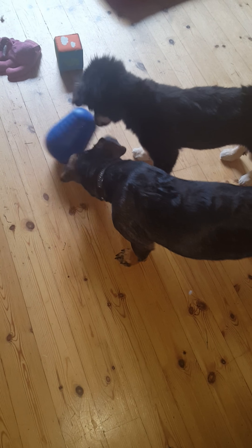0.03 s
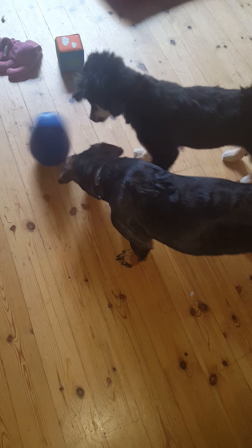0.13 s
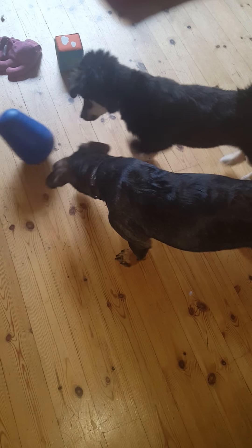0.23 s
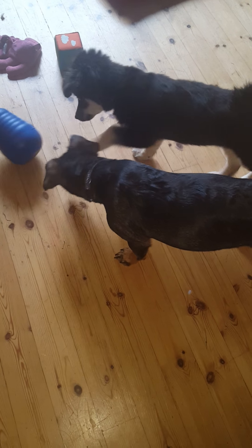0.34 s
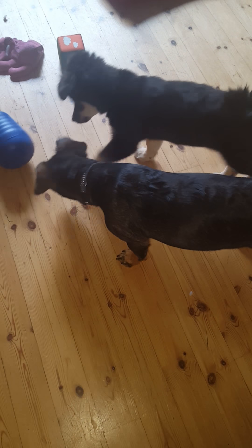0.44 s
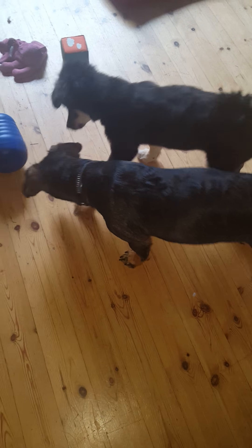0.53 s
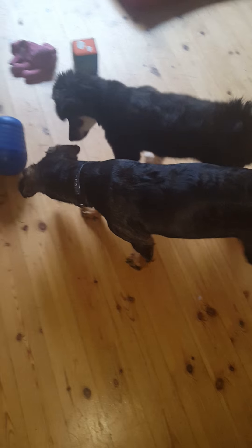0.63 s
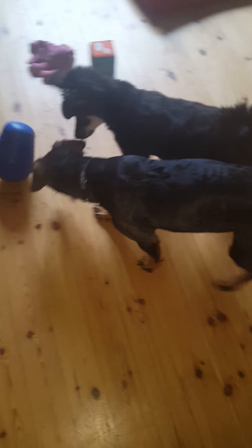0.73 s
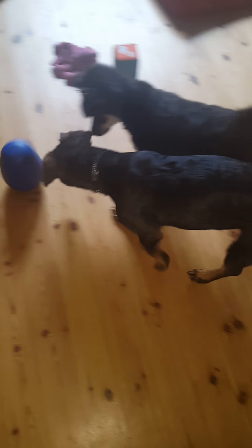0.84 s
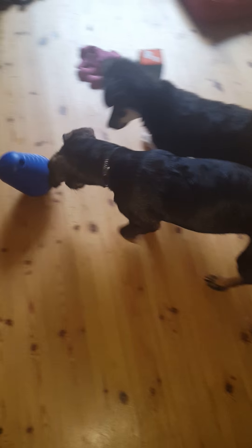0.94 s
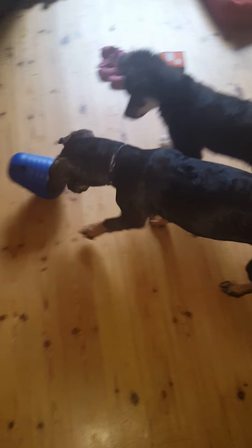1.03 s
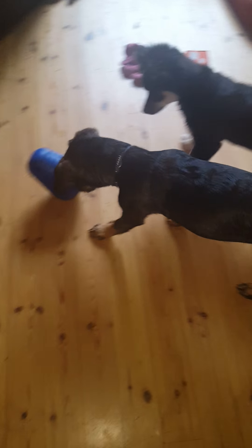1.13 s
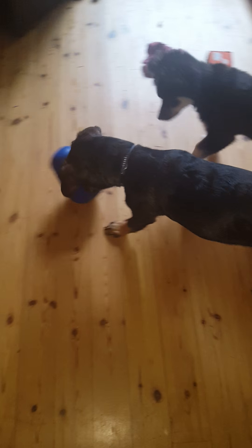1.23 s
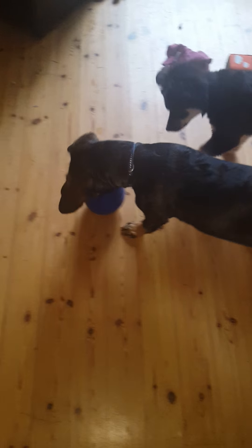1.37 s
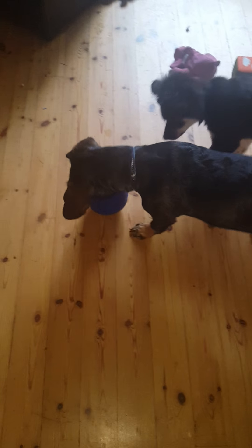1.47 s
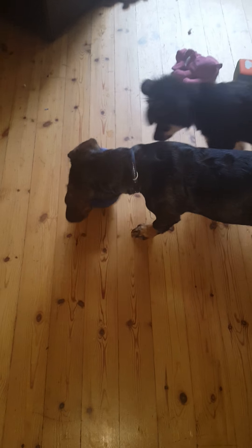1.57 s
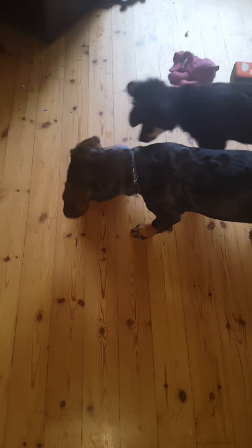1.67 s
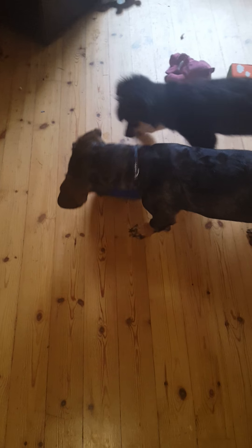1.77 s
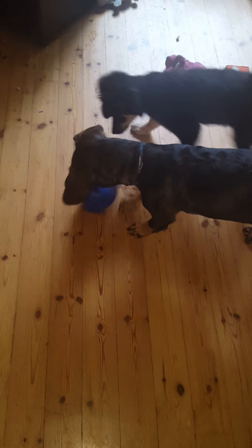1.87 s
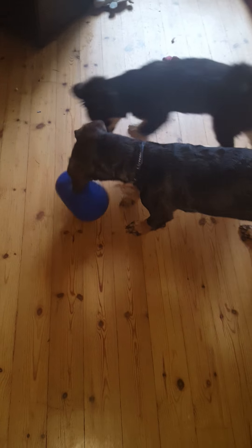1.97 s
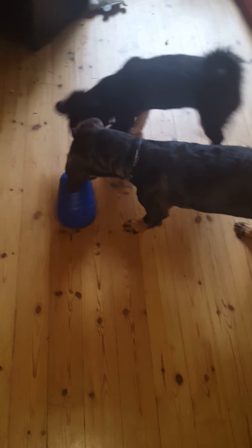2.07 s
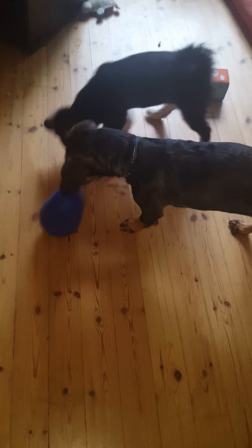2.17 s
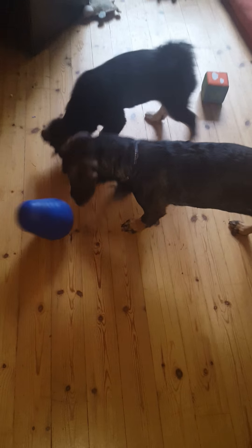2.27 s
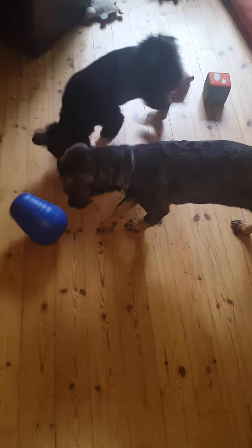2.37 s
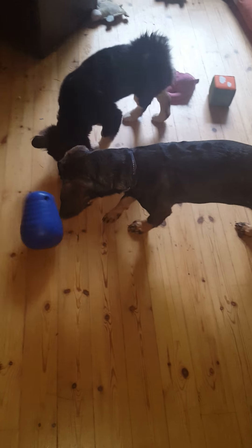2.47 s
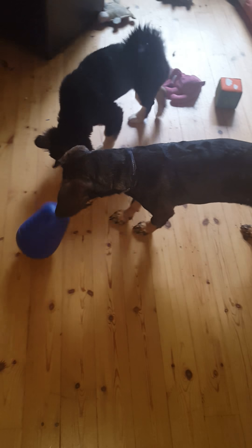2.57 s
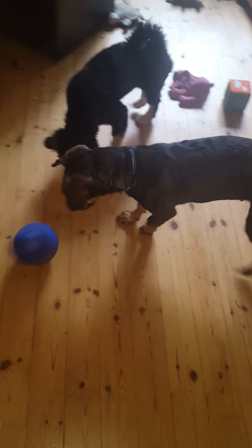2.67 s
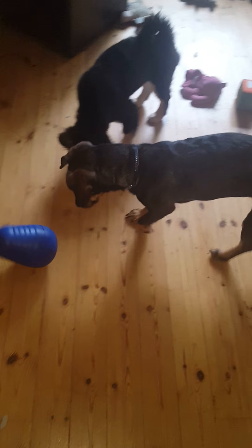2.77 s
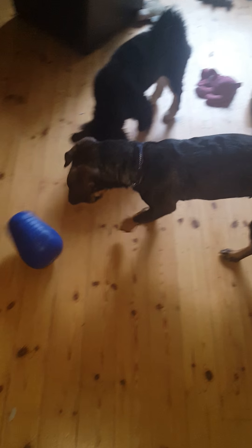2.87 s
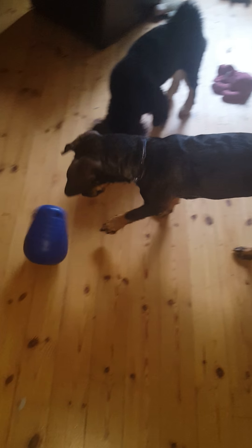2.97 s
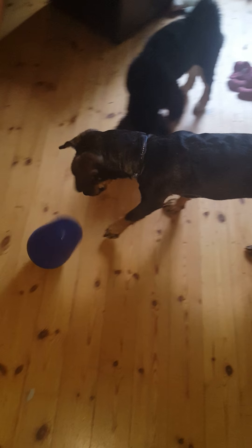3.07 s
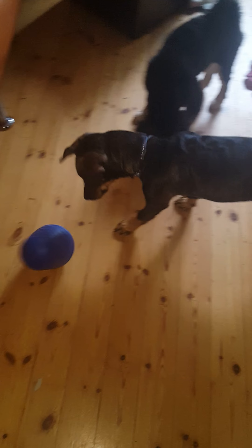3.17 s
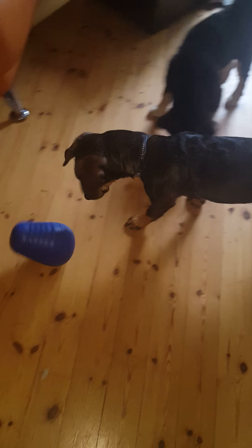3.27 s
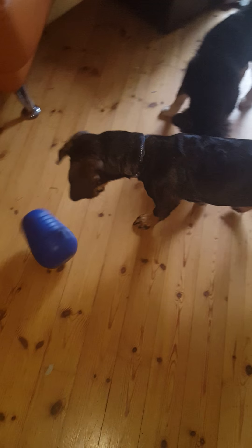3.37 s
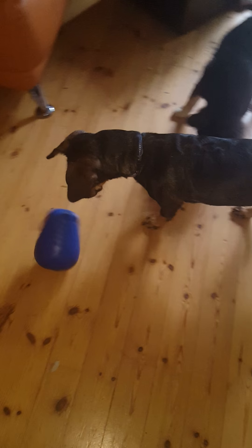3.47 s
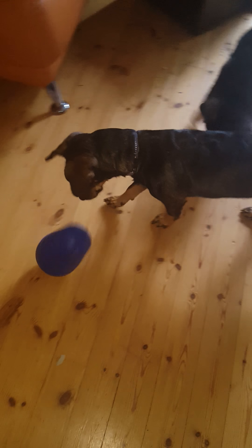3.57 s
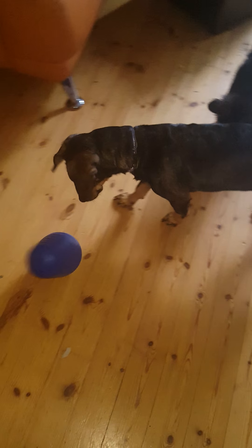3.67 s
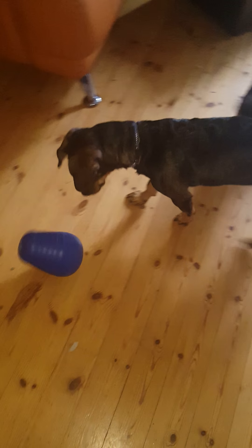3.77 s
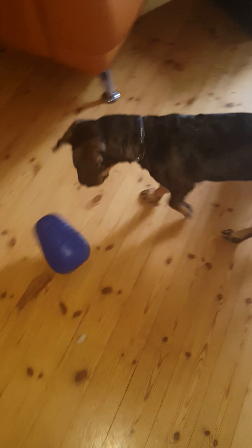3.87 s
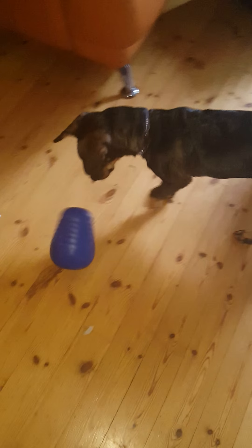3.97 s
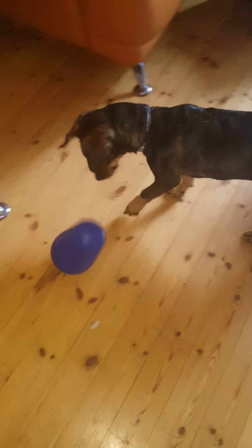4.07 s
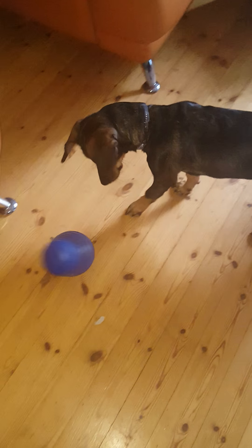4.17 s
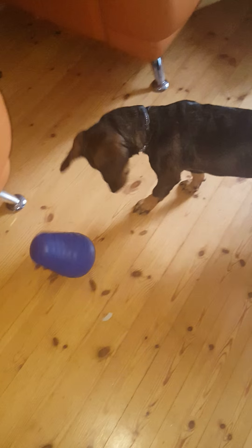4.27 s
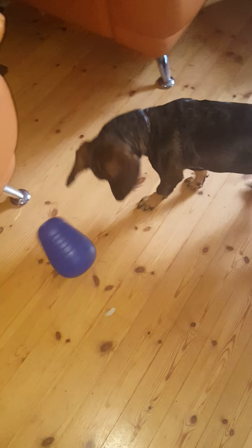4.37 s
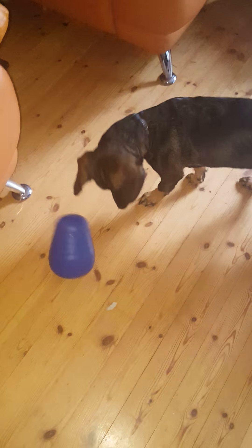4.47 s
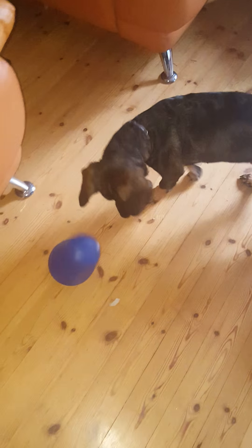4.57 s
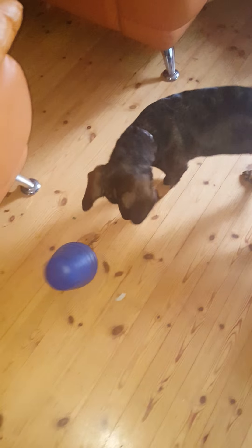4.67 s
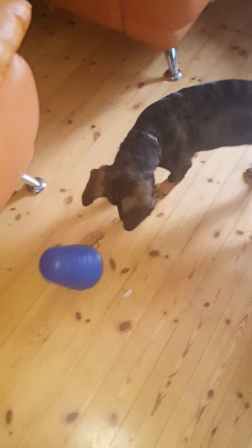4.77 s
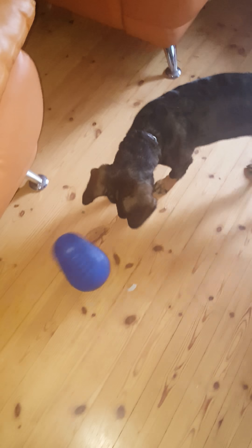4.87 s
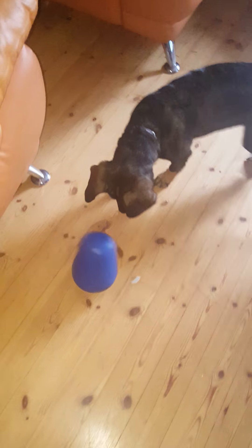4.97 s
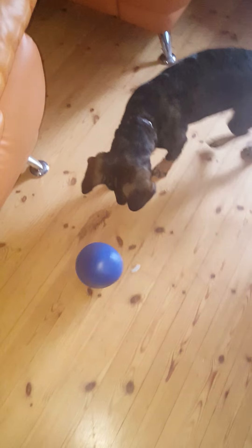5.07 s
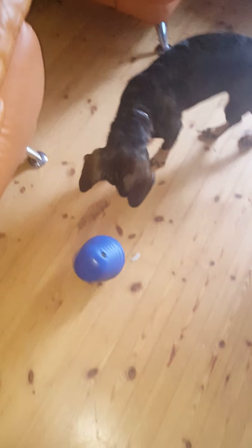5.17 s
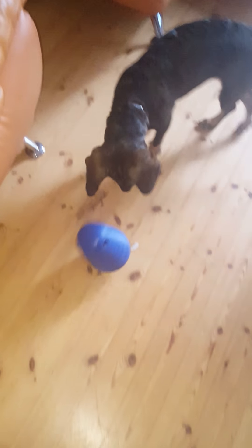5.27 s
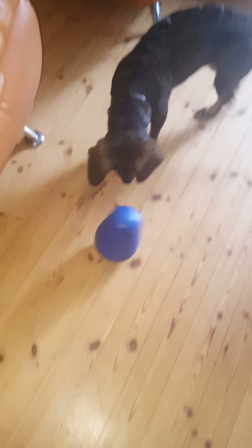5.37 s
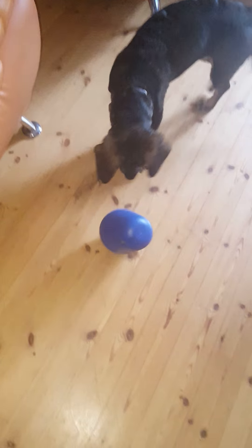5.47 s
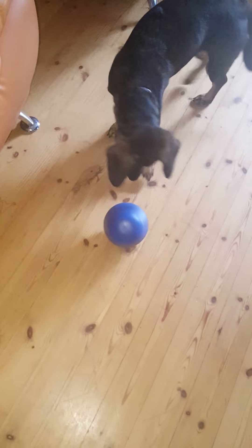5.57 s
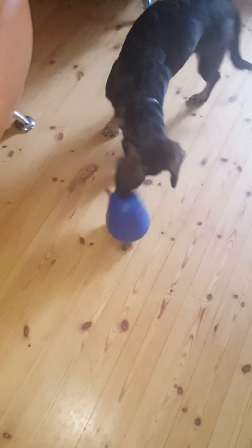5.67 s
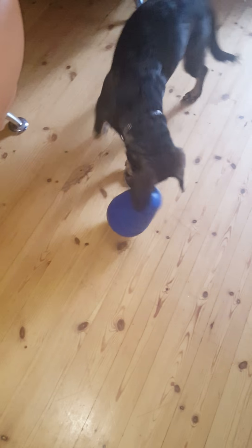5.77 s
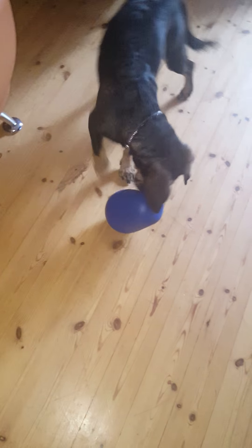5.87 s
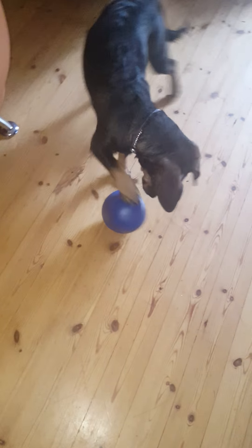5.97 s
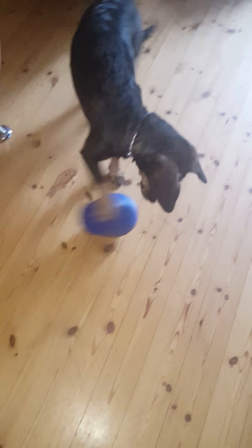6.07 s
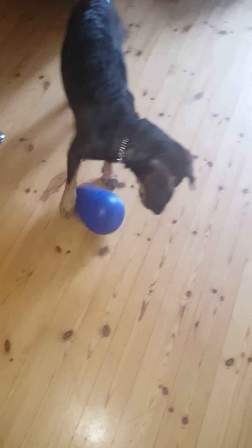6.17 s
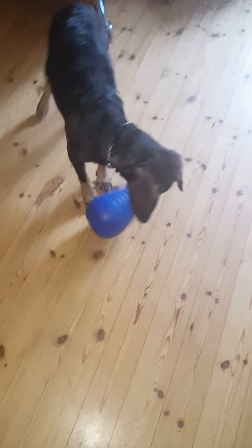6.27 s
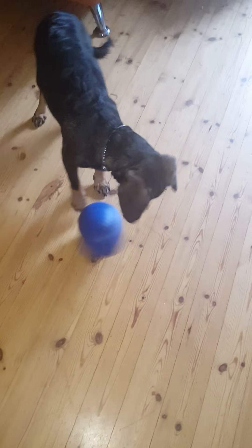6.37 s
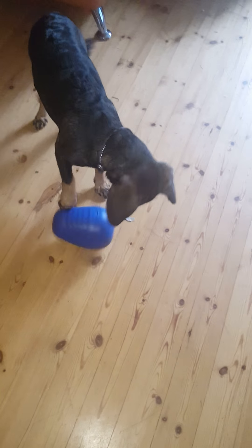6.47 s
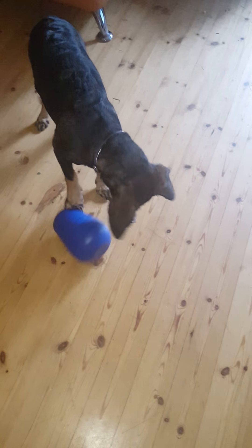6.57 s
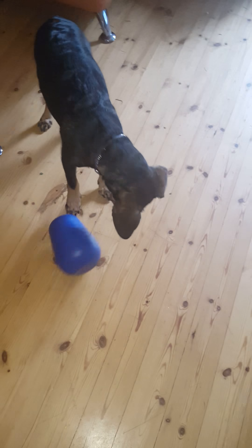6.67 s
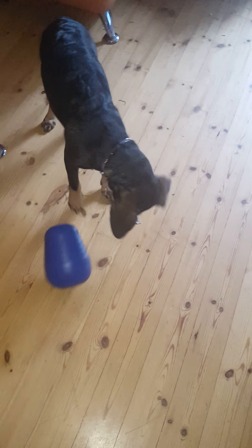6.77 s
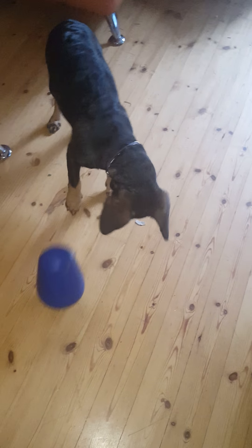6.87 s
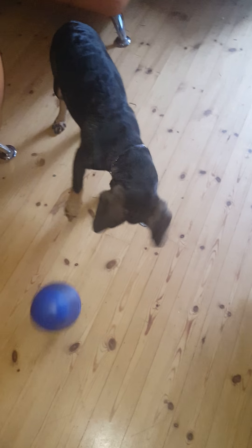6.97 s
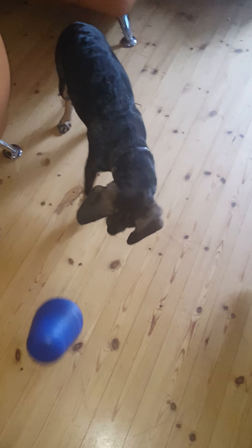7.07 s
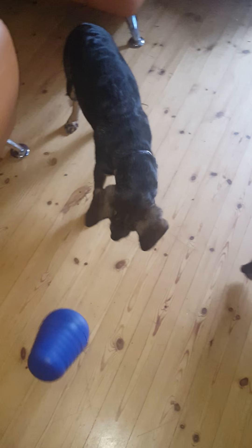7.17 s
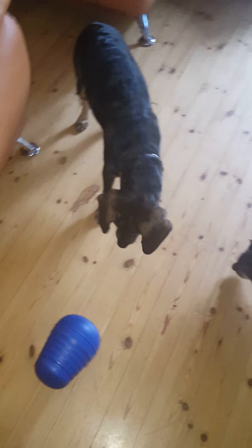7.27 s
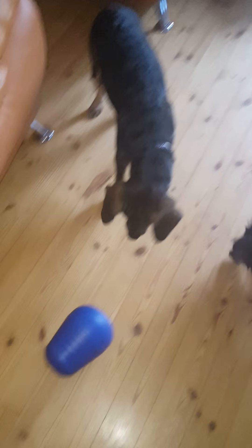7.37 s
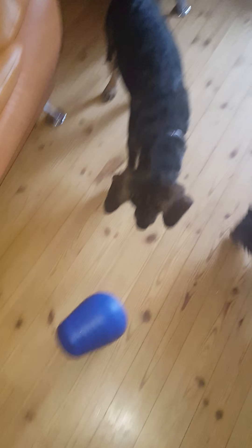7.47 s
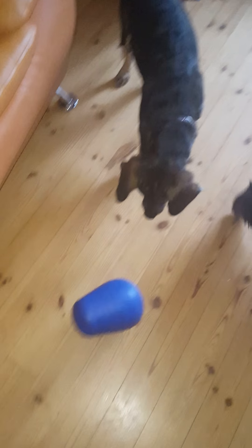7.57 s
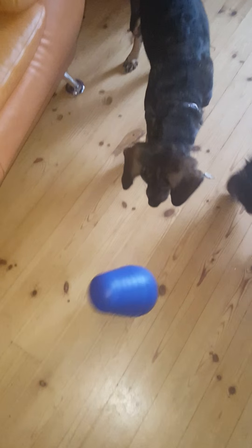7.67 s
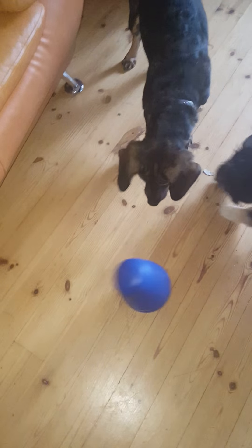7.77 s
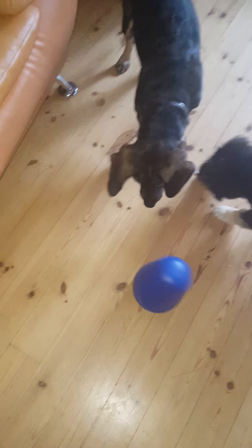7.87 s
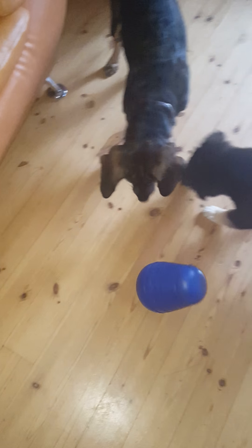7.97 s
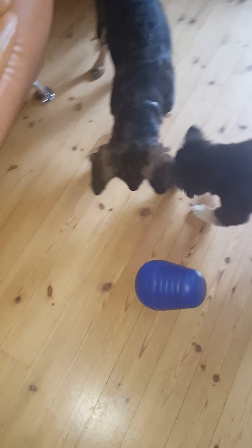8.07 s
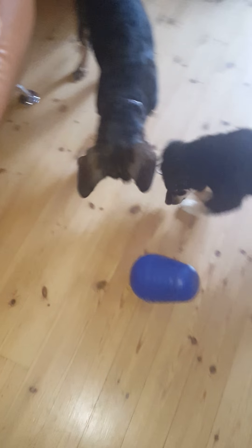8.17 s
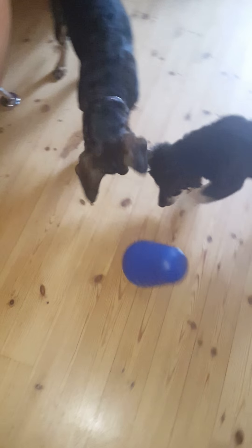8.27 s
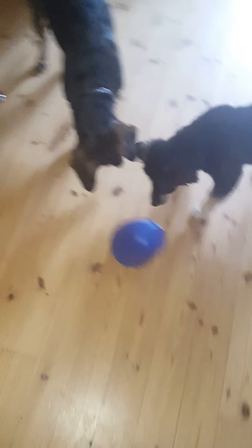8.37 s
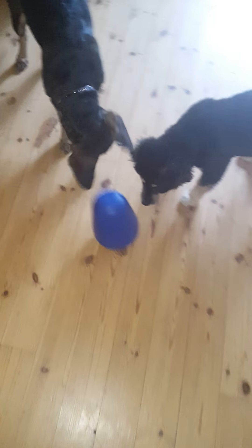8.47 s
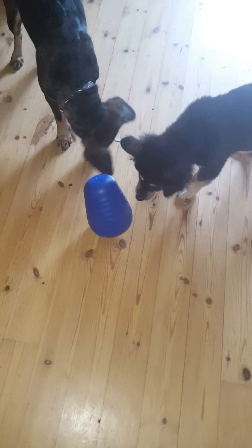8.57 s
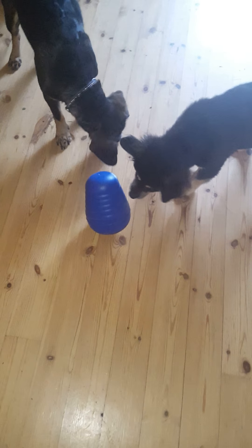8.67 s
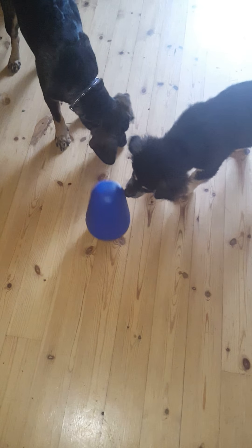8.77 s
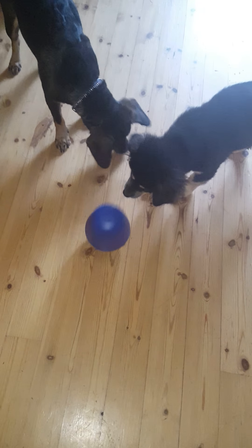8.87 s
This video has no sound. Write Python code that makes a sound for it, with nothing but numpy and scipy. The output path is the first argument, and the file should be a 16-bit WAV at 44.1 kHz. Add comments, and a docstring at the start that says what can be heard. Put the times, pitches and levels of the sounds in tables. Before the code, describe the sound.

A weighted hard plastic toy wobbles on a wooden floor, pellets sliding inside. Early thumps and rattles lead to a heavy bump, then fade into gentle rolling with faint taps. Later a paw presses it into a rapid run of woody knocks, claw clicks and bright rattling, followed by isolated thumps. Heard at close range in a small reverberant room with faint air noise, no voices.

```python
"""Dry kibble rattles in a hollow toy as it rumbles over floorboards, and its weighted base thumps at once.
Dogs nose and paw this plastic treat toy in a living room; claws, teeth and pellets click, skid and rub.
Kibble, rolling: random tiny impacts through shell, body and board resonances, gated by spells of motion.
Knocks, clicks, scrapes: timed contact forces through the same modes. Paws: shaped noise strokes.
Each contact and motion gets a short random stereo room tail; faint shaped noise is the room's air."""
import sys
import numpy as np
from scipy import signal
from scipy.fft import rfft, irfft, next_fast_len
from scipy.io import wavfile
from scipy.ndimage import uniform_filter1d

SR = 44100
rng = np.random.default_rng(int(sys.argv[2]) if len(sys.argv) > 2 else 0)


def store_wav(level_fs):
    """Save 16-bit WAV to argv[1]."""
    pcm = np.round(np.clip(np.atleast_2d(level_fs), -1, 1) * 32767)
    wavfile.write(sys.argv[1], SR, pcm.T.astype(np.int16))


N = 392931
HIT = SR * 2 // 5  # samples per contact and per room tail
LEAD = SR // 50  # samples of swell ahead of a knock's blow


def amp(db):
    """Decibels to gain."""
    return 10 ** (np.asarray(db) / 20)


def unit(x):
    """Scale to rms 1."""
    return x / np.sqrt(np.mean(x ** 2) + 1e-20)


def along(points, hz):
    """(Hz, value) points interpolated on a log-frequency axis."""
    f, v = np.transpose(points)
    return np.interp(np.log(hz + 1), np.log(f + 1), v)


def filtered(x, response):
    """x times a response of frequency."""
    n = x.shape[-1]
    m = next_fast_len(n + SR // 10, real=True)
    hz = np.fft.rfftfreq(m, 1 / SR)
    return irfft(rfft(x, m) * response(hz), m)[..., :n]


def coloured(x, spectrum):
    """x through a broad spectral shape."""
    return filtered(x, lambda hz: amp(along(spectrum, hz)))


def bank(modes, hz):
    """Response of a set of resonances that radiate little outside their own range."""
    rings = 0
    for k, (centre, width, db) in enumerate(modes):
        damping = 1j * hz * width
        # alternate modes move in opposite phase
        rings = rings + (-1) ** k * amp(db) * damping / (centre * centre - hz * hz + damping)
    below = modes[0][0] * 0.66 / (hz + 1)
    above = hz / (modes[-1][0] * 0.94)
    return rings / np.sqrt((1 + below ** 4) * (1 + above ** 4))


def ringing(x, modes):
    """x through a set of resonances."""
    return filtered(x, lambda hz: bank(modes, hz))


def hump(hz, centre_hz, octaves):
    """A broad emphasis around one pitch."""
    return 1 / (1 + (np.log2((hz + 1) / centre_hz) / octaves) ** 2)


def ringing_near(x, modes, centre_hz, octaves):
    """x through resonances, favouring those near one pitch."""
    return filtered(x, lambda hz: bank(modes, hz) * hump(hz, centre_hz, octaves))


def wobble(rate):
    """A smooth random curve, rate knots a second."""
    knots = rng.standard_normal(int(N * rate / SR) + 2)
    return np.interp(np.arange(N) * rate / SR, np.arange(len(knots)), knots)


def struck(x):
    """Scale each contact to the energy of 30 ms at rms 1."""
    return x / np.sqrt(np.sum(x ** 2, axis=(1, 2), keepdims=True) / (2 * 0.03 * SR))


def placed(times_s, sounds):
    """A stereo track with each sound starting at its time."""
    out = np.zeros((2, N + SR))
    for s, sound in zip(np.ravel(times_s), sounds):
        start = max(round(s * SR) + LEAD, 0)
        out[:, start:start + sound.shape[-1]] += sound
    return out[:, LEAD:LEAD + N]


# room decay: f/Hz, t60/s
WALLS_T60 = [(120, 0.37), (300, 0.33), (1000, 0.56), (4000, 0.44), (8000, 0.39), (15000, 0.27)]
# left-right correlation of the tail: f/Hz, correlation
TAIL_CORRELATION = [(100, 0.92), (280, 1), (500, 0.33), (900, 0), (3000, 0), (12000, 0)]


def tails(count, wet_db):
    """The room's stereo answer from count places: noise decaying at its own rate in each band."""
    hz, t, z = signal.stft(rng.standard_normal((count, 2, HIT)), SR, nperseg=256)
    turn = np.arccos(np.clip(along(TAIL_CORRELATION, hz), -1, 1))[:, None] / 2
    mid = z[:, 0] * np.cos(turn)
    side = z[:, 1] * np.sin(turn)
    decay = amp(-60 * t / along(WALLS_T60, hz)[:, None])
    fade = decay * (1 - np.exp(-t / 0.00028))
    stereo = np.stack([mid + side, mid - side], 1)
    echo = signal.istft(stereo * fade, SR, nperseg=256)[1][..., :HIT]
    return echo * amp(wet_db) / np.sqrt(np.mean(np.sum(echo ** 2, axis=-1)))


def paths(count, wet_db):
    """Direct impulse plus room tail; the direct sound reaches the right port 3 samples later."""
    heard = tails(count, wet_db)
    heard[:, 0, 0] += 1
    heard[:, 1, 3] += 1
    return heard


def wandering(x, wet_db, count=36):
    """A moving source: each of count slices takes its own random path to the microphone."""
    size = -(-N // count)
    pieces = np.pad(x, (0, size * count - N)).reshape(count, 1, size)
    heard = signal.fftconvolve(pieces, paths(count, wet_db), axes=-1)
    return placed(np.arange(count) * size / SR, heard) / np.sqrt(1 + amp(wet_db) ** 2)


def impacts(rate, spread_db, clump_db):
    """Random tiny impacts, rate a second, in clumps; energy evened out over 50 ms."""
    spread = spread_db * np.clip(rng.standard_normal(N), -2, 2)
    size = amp(spread + clump_db * wobble(130))
    hits = size * rng.choice([-1, 1], N) * (rng.random(N) < rate / SR)
    local_power = np.abs(uniform_filter1d(hits ** 2, size=SR // 20))
    return unit(hits / np.sqrt(local_power + 1e-9))


BRISK_DB, GENTLE_SLOWER = -36, 0.3  # level where rise_s is the swell time; dB of extra time per dB below


def spells(starts, lengths, levels_db, rise_s, sag_db_per_s, stop_s):
    """Gain of motions that swell, sag and die away; overlapping ones add in power."""
    ahead = SR // 5
    t = np.arange(-ahead, SR) / SR
    power = np.zeros(N + 2 * SR)
    for s, length, db in zip(starts, lengths, levels_db):
        rise = rise_s * amp(GENTLE_SLOWER * (BRISK_DB - db))  # gentle motions swell more slowly
        swell = (1 + np.tanh((t - rise_s) / rise / 2)) / 2
        stop_db = 60 * np.maximum(t - length, 0) / stop_s
        gain = swell * amp(db - sag_db_per_s * t - stop_db)
        power[SR + round(s * SR) - ahead:][:len(t)] += gain ** 2
    return np.sqrt(power[SR:SR + N])


# kibble slides as the toy tips: t/s, length/s, level/dB, hollow ring re level/dB
SPILL_EVENTS = [(-0.08, 0.093, -33.5, -2.5), (0.08, 0.2, -38.5, -4.5), (0.356, 0.11, -29, -6.5),
                (0.637, 0.27, -38.5, -5.5), (1.035, 0.093, -42, -3.5), (1.091, 0.092, -38.5, -4.5),
                (1.274, 0.07, -42, -5.5), (1.409, 0.074, -33, -17), (1.61, 0.37, -36.5, -10),
                (1.808, 0.14, -25, -6), (1.98, 0.14, -44.5, 0.5), (2.285, 0.096, -37, -27),
                (2.44, 0.16, -55.5, 2), (2.662, 0.091, -48.5, -1.5), (3.107, 0.28, -60.5, 5.5),
                (3.643, 0.14, -63, -1), (3.827, 0.077, -48.5, -1), (4.172, 0.24, -47, -2),
                (4.605, 0.37, -53.5, 1), (4.81, 0.037, -42.5, -7), (5.057, 0.035, -61.5, 12),
                (5.197, 0.17, -54, 5.5), (5.518, 0.13, -57, 1), (5.74, 0.027, -54.5, 3.5),
                (6.185, 0.14, -28, 0.5), (6.337, 0.37, -25, -4.5), (6.736, 0.43, -39.5, 1),
                (7.095, 0.17, -30.5, -6.5), (7.257, 0.28, -47, 1.5), (7.597, 0.36, -52.5, 0),
                (7.826, 0.24, -48.5, -4), (8.113, 0.15, -34.5, -8), (8.454, 0.067, -43.5, -5.5),
                (8.61, 0.078, -36.5, -4), (8.678, 0.1, -36, -6.5)]
# low, hollow shell modes: f/Hz, width/Hz, level/dB
SHELL_LOW_MODES = [(814.3, 7.5, 3.5), (945, 67, -1.5), (1210.5, 31.4, 6.5), (1348, 107, -5.5),
                   (1744, 440, -12.5)]
# high shell modes: f/Hz, width/Hz, level/dB
SHELL_HIGH_MODES = [(2385, 168, 0), (2535, 15.6, 6.5), (2693, 108, 2), (3078, 92, 0.5), (3470, 310, -2.5),
                    (3830, 260, -4), (4230, 200, -2.5), (4736, 123, 2.5), (5360, 1120, -7.5)]
# dry treble of a contact: f/Hz, level/dB
SNAP_SPECTRUM = [(3500, -44), (6000, 4), (7800, 6.5), (10000, 2), (13000, -0.5), (16000, -11)]
SPILL_RISE_S, SPILL_SAG_DB_PER_S, SPILL_STOP_S, SPILL_IDLE_DB = 0.013, 19.5, 0.44, -88
FIZZ_DB, FIZZ_GROWS = -29.5, 0.73  # fizz beside a 0 dB rattle; dB gained per dB of rattle


def kibble():
    """Clumped pellet impacts feed the shell's high and low modes and a dry fizz."""
    s, length, db, ring_db = np.transpose(SPILL_EVENTS)

    def motion(level_db):
        gain = spells(s, length, level_db, SPILL_RISE_S, SPILL_SAG_DB_PER_S, SPILL_STOP_S)
        return gain + amp(SPILL_IDLE_DB)

    tumble = motion(db)
    ring = motion(db + ring_db)
    pellets = impacts(rate=300, spread_db=4.5, clump_db=4.5)
    # each pellet chatters on the wall for about 2 ms
    chatter = rng.standard_normal(N) * np.sqrt(np.abs(uniform_filter1d(pellets ** 2, size=90)))
    rattle = tumble * unit(ringing(pellets, SHELL_HIGH_MODES))
    # as the toy turns, the pellets land where different modes are strong
    turning = sum(amp(4.2 * wobble(8)) * ringing(pellets, [mode]) for mode in SHELL_LOW_MODES)
    hollow = ring * unit(turning)
    fizz = tumble ** FIZZ_GROWS * amp(FIZZ_DB) * unit(coloured(chatter, SNAP_SPECTRUM))
    return wandering(rattle + hollow + fizz, wet_db=3.5)


# pushes and swings roll the toy: t/s, length/s, level/dB, floorboards' share of power/dB
ROLL_EVENTS = [(-0.05, 0.64, -34.5, -3.5), (0.622, 0.5, -39.5, -1.5), (1.12, 0.32, -44.5, -1.5),
               (1.492, 0.18, -39.5, 1), (1.728, 0.25, -24, -3), (2.036, 0.55, -34.5, 1),
               (2.663, 0.14, -32, -2), (2.922, 0.074, -38, 1.5), (3.095, 0.16, -35.5, -1),
               (3.355, 0.42, -47, -1), (3.622, 0.15, -34, -6.5), (3.901, 0.05, -41, -8),
               (4.13, 0.14, -41, -9), (4.333, 0.17, -45.5, -13), (4.607, 0.056, -39, -9),
               (5.044, 0.1, -40.5, -8), (5.377, 0.14, -43.5, -7), (5.69, 0.16, -45, -5),
               (6.185, 0.407, -21, -8.5), (6.682, 0.45, -31.5, -6), (7.2, 0.35, -48, -5),
               (7.8, 0.16, -36.5, -5.5), (7.898, 0.093, -31.5, -9), (8.057, 0.46, -46, -4),
               (8.453, 0.14, -30.5, -10.5), (8.69, 0.18, -50, -1)]
# floorboard modes: f/Hz, width/Hz, level/dB
BOARD_MODES = [(106.3, 25, -16), (134.3, 16, 1), (159.8, 12.9, 1.5), (190.6, 16.5, 3.5)]
# toy body modes: f/Hz, width/Hz, level/dB
BODY_MODES = [(219.2, 17.5, -1.5), (250.6, 23.3, 2.5), (311.4, 21.2, -5), (340.7, 24, -6.5)]
# woody clack modes: f/Hz, width/Hz, level/dB
CLACK_MODES = [(446, 16.3, 7), (508, 37, 1), (606.7, 11.7, -2), (659, 6.8, -2.5), (719, 5, 0),
               (768, 20.5, 0.5), (937, 63, -5), (1134, 120, -12)]
ROLL_RISE_S, ROLL_SAG_DB_PER_S, ROLL_STOP_S, ROLL_IDLE_DB = 0.021, 9, 0.27, -61.5
PRESS_FROM_DB, PRESS_RANGE_DB = -34.5, 16  # body rumble in this range: a paw bears down


def rolling():
    """Ribs and seams bump over the grain, ringing boards and body; pressed hard, they clatter more."""
    s, length, db, share_db = np.transpose(ROLL_EVENTS)
    share = np.clip(amp(share_db) ** 2, 0.02, 0.95)

    def motion(part):
        level_db = db + 10 * np.log10(part)
        gain = spells(s, length, level_db, ROLL_RISE_S, ROLL_SAG_DB_PER_S, ROLL_STOP_S)
        return gain + amp(ROLL_IDLE_DB)

    boards = motion(share)
    body = motion(1 - share)
    pressure = np.clip((20 * np.log10(body) - PRESS_FROM_DB) / PRESS_RANGE_DB, 0, 1)
    bumps = impacts(rate=300, spread_db=2.0, clump_db=2.0)
    rumble = boards * unit(ringing(bumps, BOARD_MODES)) + body * unit(ringing(bumps, BODY_MODES))
    clack = unit(ringing_near(bumps, CLACK_MODES, 830, octaves=0.82))
    clatter = body * amp(-23 + 17.3 * pressure) * clack
    return wandering(rumble + clatter, wet_db=-3.5)


# room air: f/Hz, level/dB
HUSH_SPECTRUM = [(20, -5), (50, -17), (130, -12), (300, -8.5), (600, -17.5), (1500, -22), (5000, -29.5),
                 (10000, -37), (16000, -34.5)]


def hush():
    """Quiet room air: shaped noise, part common to both channels."""
    air = rng.standard_normal(N) + 1.5 * rng.standard_normal((2, N))
    return amp(-61.0) * unit(coloured(air, HUSH_SPECTRUM))


# toy strikes floor: t/s, level/dB, boom re level/dB, clack re level/dB, favoured f/Hz
# fixed trims in knocks() add to the levels
KNOCK_EVENTS = [(0.003, -21, -3.5, -14.5, 225), (0.073, -19.5, -17, -20, 232), (0.234, -10, -18, -15, 240),
                (0.916, -13.5, -7, -18, 245), (1.743, -10, -1.5, -32, 227), (1.79, -9, -4.5, -10, 235),
                (1.836, -19, 3.5, -3.5, 200), (1.877, -16, 1.5, -5, 240), (1.908, -24, 0, 0.5, 207),
                (2.259, -17.5, 0, -11, 205), (2.305, -21.5, -6, -7.5, 262), (2.687, -28.5, -2, -22, 216),
                (4.126, -30, -6.5, -15, 253), (4.367, -34.5, -24, 1.5, 271), (4.461, -29, -9.5, -16, 239),
                (5.053, -23, -9, -11.5, 316), (5.423, -23.5, -7, -15, 312), (5.742, -27.5, -10, -12, 268),
                (5.788, -24, -10, -11, 280), (6.192, -13.5, -31, -9.5, 283), (6.215, -8.5, -28, 2.5, 318),
                (6.249, -11.5, -28, 6, 266), (6.283, -12.5, -28, -7, 331), (6.317, -17, -6, -7, 257),
                (6.372, -13, -12, 1.5, 350), (6.412, -11.5, -17, -7, 364), (6.451, -9.5, -25, -7, 347),
                (6.489, -11.5, -14, -7.5, 302), (6.559, -16, -3.5, -7, 275),
                (6.764, -11.5, -16.5, -17.5, 280), (6.867, -19, -14, -16, 265), (6.992, -13, -16, -14, 315),
                (7.05, -16, -30, -14, 264), (7.16, -34, 2.5, 8.5, 330), (7.485, -31, -8, -19, 252),
                (7.893, -6.5, -18, -20.5, 261), (8.491, -17, -6, -10, 270), (8.533, -23, -22, -25, 243),
                (8.889, -16.5, -10, -16, 268)]
REBOUND_S, REBOUND_LOG_SPREAD, REBOUND_DB = 0.02, 0.1507, -13.5
CLACK_OVER_THUMP = 2.1  # clack pitch / thump pitch


def knocks():
    """The weighted base thumps and rebounds once, exciting body modes, board boom and woody clack."""
    rebounds = np.array(KNOCK_EVENTS, float)
    rebounds[:, 0] += REBOUND_S * np.exp(REBOUND_LOG_SPREAD * rng.standard_normal(len(rebounds)))
    rebounds[:, 1] += REBOUND_DB
    landings = np.vstack([KNOCK_EVENTS, rebounds])
    s, db, boom_db, clack_db, pitch_hz = np.transpose(landings)[..., None, None]
    blow = np.pad(paths(len(s), wet_db=-0.5), ((0, 0), (0, 0), (LEAD, 0)))
    # the spot that lands decides which modes speak most
    thump = amp(-7) * struck(ringing_near(blow, BODY_MODES, pitch_hz, octaves=0.4))
    boom = amp(boom_db - 5.0) * struck(ringing(blow, BOARD_MODES))
    clack_hz = CLACK_OVER_THUMP * pitch_hz
    clack = amp(clack_db - 11.0) * struck(ringing_near(blow, CLACK_MODES, clack_hz, octaves=1.0))
    return placed(s - LEAD / SR, amp(db) * (thump + boom + clack))


# contact tick: f/Hz, level/dB
TICK_SPECTRUM = [(1200, -47), (2200, -3), (3200, 4), (4500, 13.5), (6000, 2), (8000, -16), (12000, -50)]


def shell(force, ring_db, snap_db, pitch_hz):
    """Forces ring the plastic shell, tick at a pitch set by contact hardness and snap in the treble."""
    force = np.pad(force, ((0, 0), (0, 0), (0, HIT - force.shape[-1])))
    # the room fills as the contact delivers its energy
    blow = force + tails(len(force), wet_db=5.5) * np.sqrt(np.cumsum(force ** 2, axis=-1))
    wall = amp(-14.0) * struck(ringing_near(blow, SHELL_HIGH_MODES, pitch_hz, octaves=1.0))
    hollow = amp(ring_db - 11) * struck(ringing(blow, SHELL_LOW_MODES))
    ticking = filtered(blow, lambda hz: amp(along(TICK_SPECTRUM, hz)) * hump(hz, pitch_hz, octaves=0.34))
    tick = amp(-14) * struck(ticking)
    snap = amp(snap_db - 7) * struck(coloured(blow, SNAP_SPECTRUM))
    return wall + hollow + tick + snap


# sharp shell contacts: t/s, level/dB, ring re level/dB, snap re level/dB, f/Hz; shell() trims add
CLICK_EVENTS = [(0.3371, -18, -7, -20, 4000), (0.4423, -20.5, -7, -15.5, 2860),
                (0.5014, -22, -22, -43, 2670), (0.6248, -17.5, -16, -17, 4970),
                (1.291, -28.5, -9, -27, 4100), (1.8801, -9, -7.5, -18, 2540), (1.921, -15, -19, -34, 3050),
                (2.1101, -24, -19, -49, 2630), (2.302, -18, 2, -10, 2960), (2.582, -45, -17, -4, 2700),
                (2.7769, -39.5, -6, -15, 3660), (2.8662, -35, -6.5, -41, 2440), (3.634, -57, -9, -8, 2370),
                (4.369, -32.5, -2.5, -9.5, 2500), (5.092, -40.5, -1, -35, 2320),
                (5.2427, -39, -21, -45, 2600), (5.3605, -34, -23, -36, 4170), (5.5548, -41, -9, -38, 3200),
                (5.6094, -39, -11, -30, 3270), (5.6685, -38.5, -20, -28, 3200), (5.985, -44, -7, -40, 3340),
                (6.165, -35, -11, -14, 2320), (6.2167, -14, -1, -19.5, 2820),
                (6.316, -14, -23, -19.5, 2650), (6.337, -13, -23, -21, 4000), (6.3791, -11, -2, -17, 3280),
                (6.5704, -10.5, -15, -24, 3060), (6.5996, -12.5, -26, -34, 4080),
                (6.6247, -15, -23, -21, 3940), (6.6568, -13.5, -13, -19.5, 2380),
                (6.8282, -24.5, -7, -26, 2350), (6.8591, -24, 1, -24, 2530), (6.92, -20, -11, -26, 2940),
                (6.9401, -20.5, -23, -28.5, 2940), (6.9909, -20, -24, -40, 2170),
                (7.026, -26.5, -2, -20, 2330), (7.094, -18, -27, -17.5, 3050),
                (7.1487, -10.5, -10.5, -24.5, 2820), (7.169, -19, 0, -27, 2660),
                (7.1835, -18, -8, -32, 2670), (7.208, -17.5, -30, -23, 2580), (7.235, -17, -20, -24, 2730),
                (7.4841, -31.5, -4, -43, 2450), (8.019, -36, -9, -37, 2270), (8.09, -11, -8, -25, 2930),
                (8.116, -13.5, -18, -15.5, 3500), (8.2011, -16.5, -8.5, -33, 2940),
                (8.258, -36, -16, -32, 2360), (8.4786, -34, -7, -31, 3490), (8.5946, -31, -5, -39, 3480),
                (8.699, -17.5, -22, -20, 3370)]


def clicks(contact_s=0.00094):
    """Pellets and claws hit the shell, each in a noise burst of a few milliseconds."""
    s, db, ring_db, snap_db, pitch_hz = np.transpose(CLICK_EVENTS)[..., None, None]
    u = np.arange(SR // 50) / SR / contact_s
    force = rng.standard_normal((len(s), 1, len(u))) * u * np.exp(-u)
    return placed(s, amp(db) * shell(force, ring_db, snap_db, pitch_hz))


# claws and teeth skid over the ribs: t/s, level/dB (3.5 dB added), ring re level/dB,
# snap re level/dB, f/Hz, length/s; shell() trims add
SCRAPE_EVENTS = [(1.429, -23.5, -2.5, -3.5, 4170, 0.024), (1.631, -25, -13, -11, 4530, 0.065),
                 (2.296, -24.5, 1, -7.5, 3200, 0.016), (6.036, -26, -16, -9.5, 3780, 0.019),
                 (6.51, -16.5, -0.5, -9.5, 3960, 0.02)]


def scrapes():
    """A skid is a run of tiny slips that stops when the claw leaves the shell."""
    s, db, ring_db, snap_db, pitch_hz, length = np.transpose(SCRAPE_EVENTS)[..., None, None]
    t = np.arange(SR // 10) / SR
    slips = rng.standard_normal((len(s), 1, len(t))) * amp(1.6 * wobble(370)[:len(t)])
    force = slips * (1 - np.exp(-t / (0.075 * length))) * np.exp(-(t / length) ** 4)
    return placed(s, amp(db + 3.5) * shell(force, ring_db, snap_db, pitch_hz))


# paws slide on the boards: t/s, length/s, level/dB, f/Hz
PAW_EVENTS = [(5.204, 0.17, -43.5, 3000), (6.126, .07, -51, 2400), (8.379, 0.042, -43.5, 744),
              (8.418, 0.059, -53, 710)]


def paws():
    """Pads rub over the wood in soft, grainy strokes of band-shaped noise."""
    t = np.arange(N) / SR
    rub = np.zeros(N)
    for s, length, db, pitch_hz in PAW_EVENTS:
        inside = (t > s) & (t < s + length)
        count = inside.sum()
        grain = rng.standard_normal(count) * amp(7.3 * wobble(200)[:count])
        stroke = np.sqrt(np.abs(np.sin(np.pi * (t[inside] - s) / length)))
        friction = unit(filtered(grain, lambda hz: hump(hz, pitch_hz, octaves=0.72) ** 2))
        rub[inside] += amp(db) * stroke * friction
    return wandering(rub, wet_db=-0.5)


# stereo balance: f/Hz, left minus right/dB
LEFT_MINUS_RIGHT = [(60, 0.1), (250, -2.5), (600, -4.5), (1100, -0.6), (2200, -3.5), (4200, -4.5),
                    (8000, -5), (13000, 1)]


def scene():
    """Sum of all layers; the right channel is the stronger through most of the band."""
    both = kibble() + rolling() + hush() + knocks() + clicks() + scrapes() + paws()
    return filtered(both, lambda hz: amp(np.outer([0.5, -0.5], along(LEFT_MINUS_RIGHT, hz))))


TOP_HZ = 16000


def record(dry):
    """Band limit: nothing passes at TOP_HZ or above."""
    return filtered(dry, lambda hz: hz < TOP_HZ)


dry = scene()
out = record(dry)
store_wav(out)
```